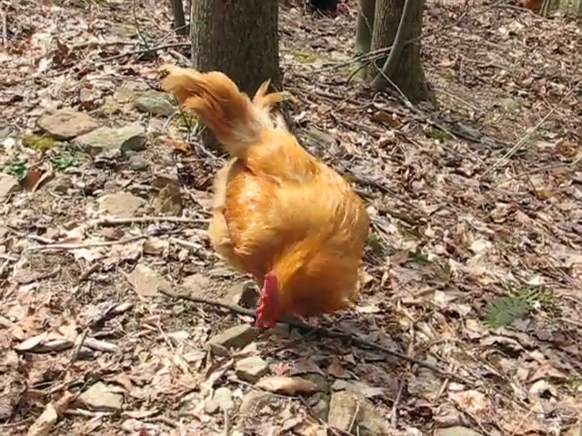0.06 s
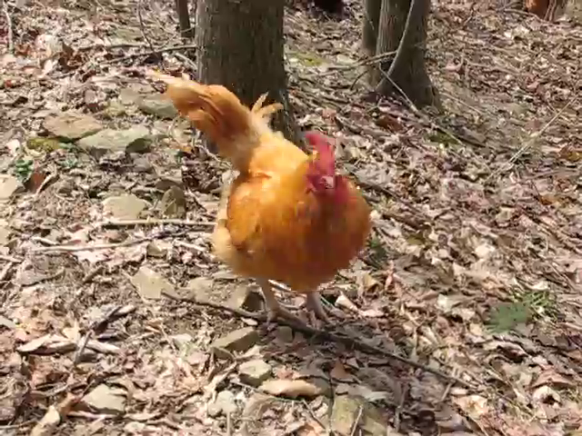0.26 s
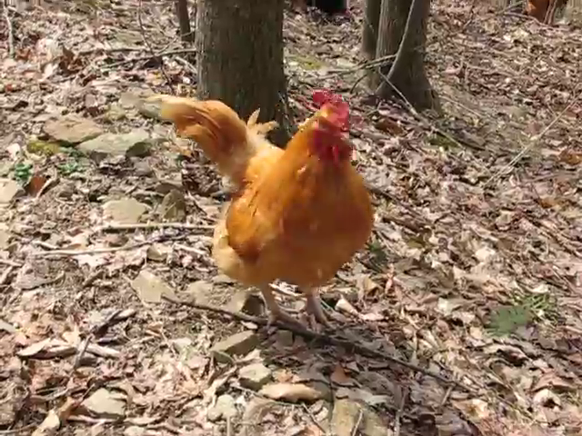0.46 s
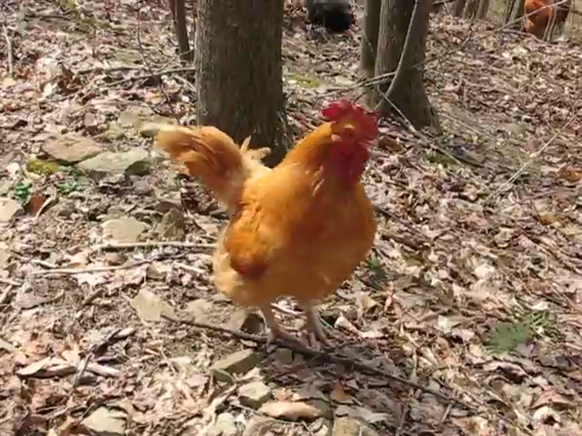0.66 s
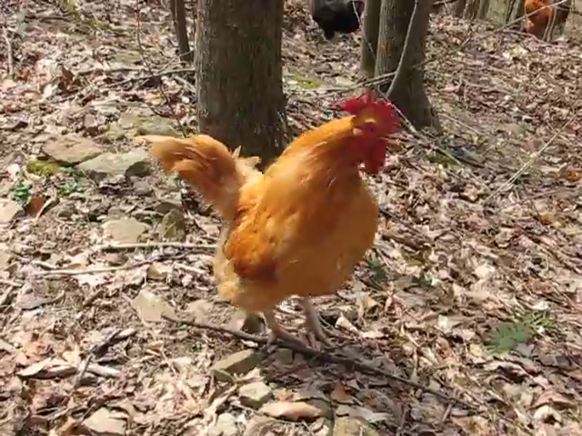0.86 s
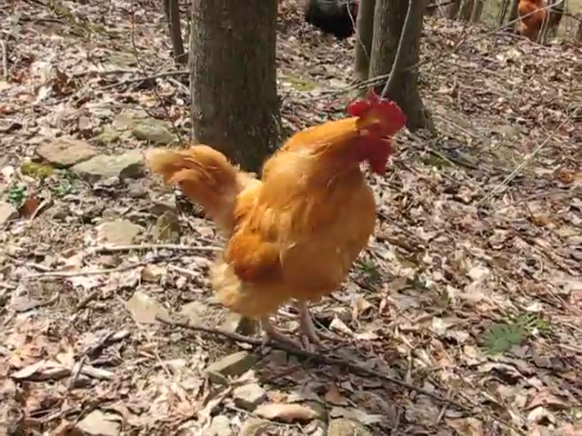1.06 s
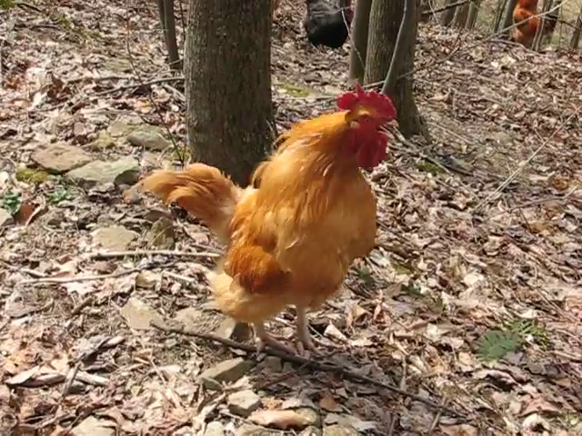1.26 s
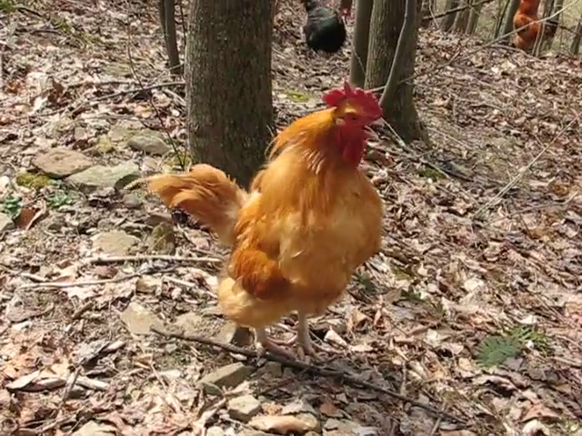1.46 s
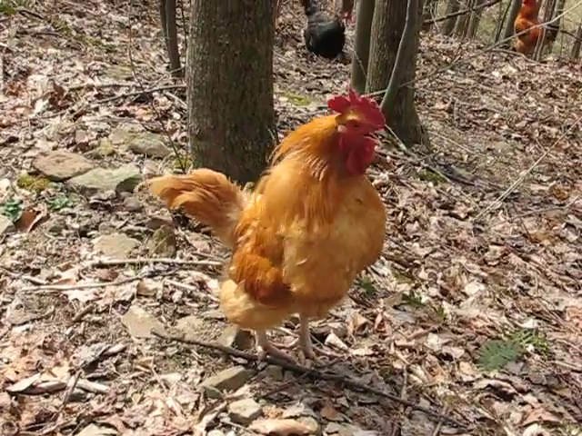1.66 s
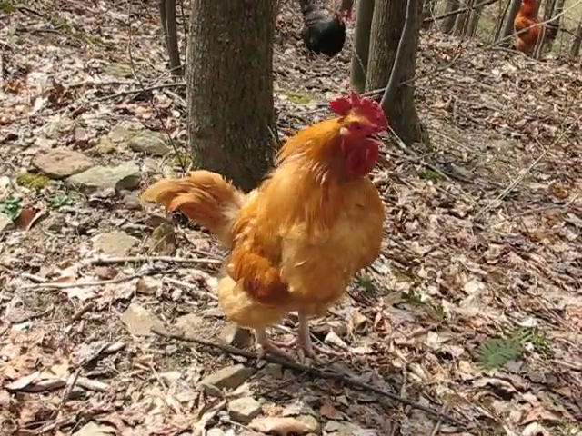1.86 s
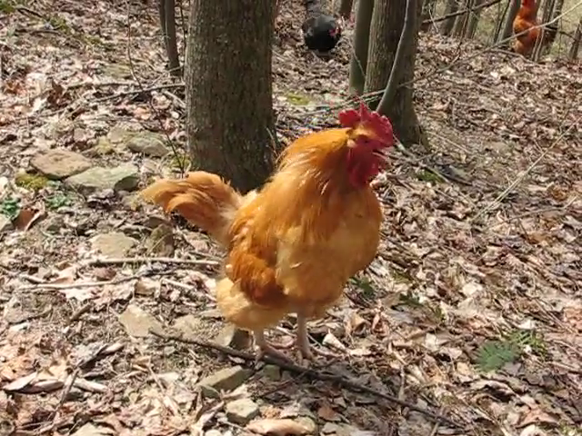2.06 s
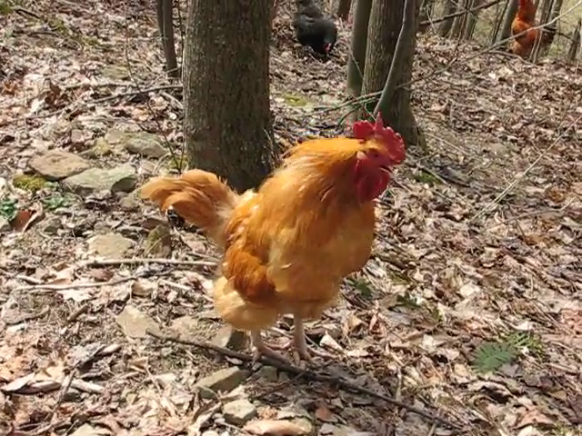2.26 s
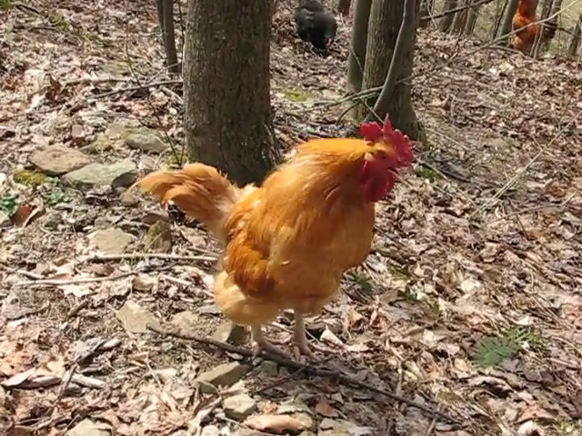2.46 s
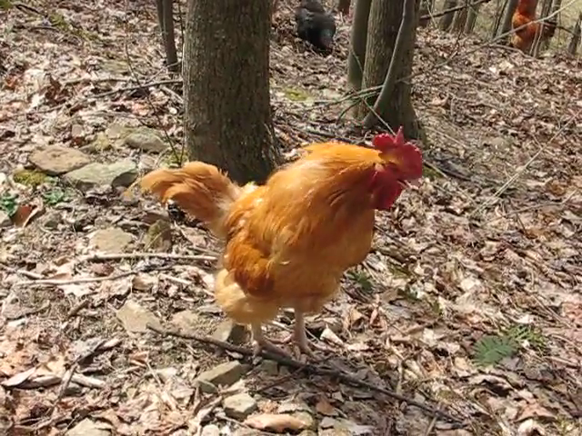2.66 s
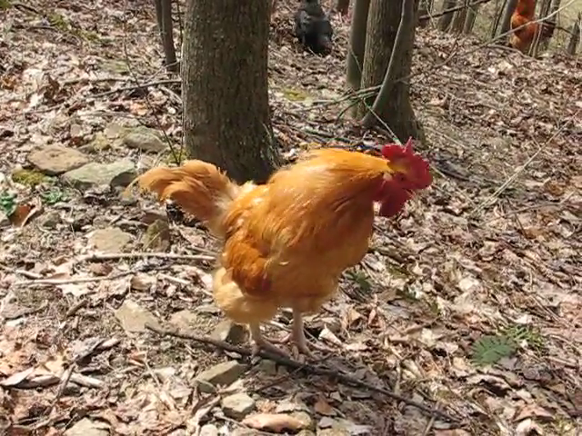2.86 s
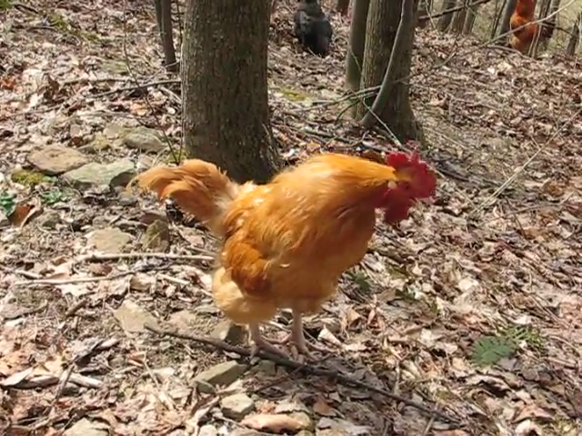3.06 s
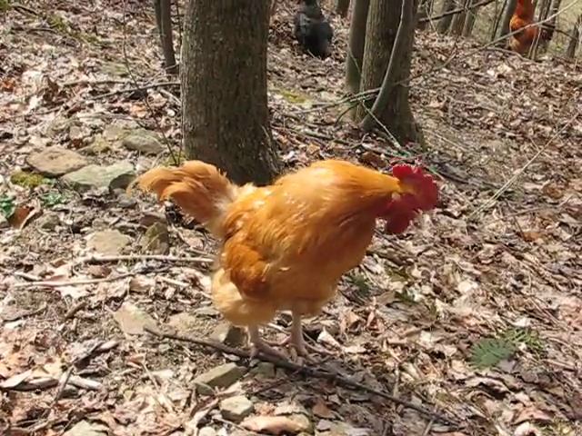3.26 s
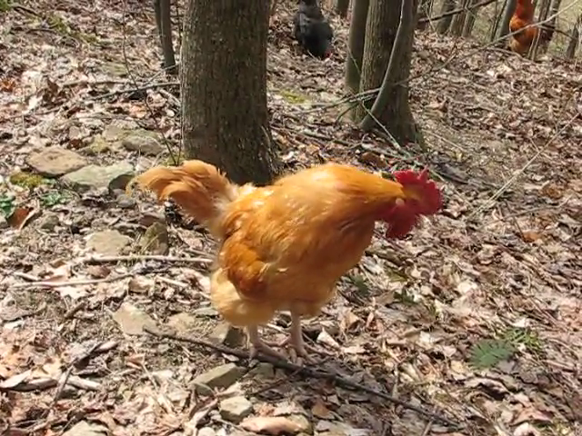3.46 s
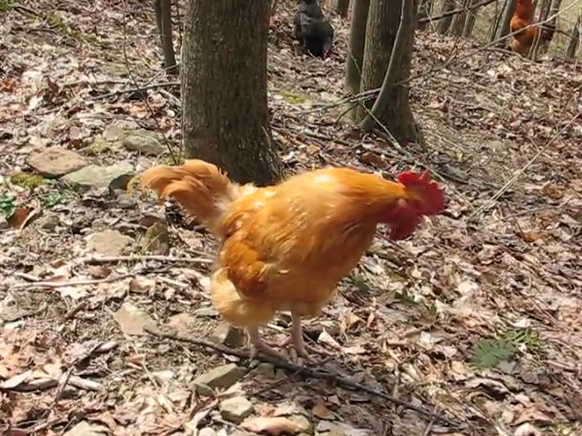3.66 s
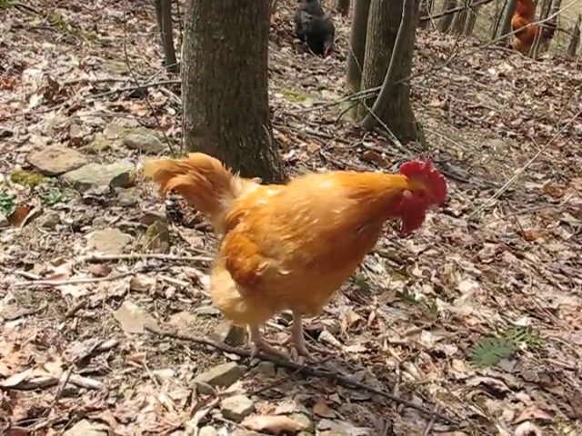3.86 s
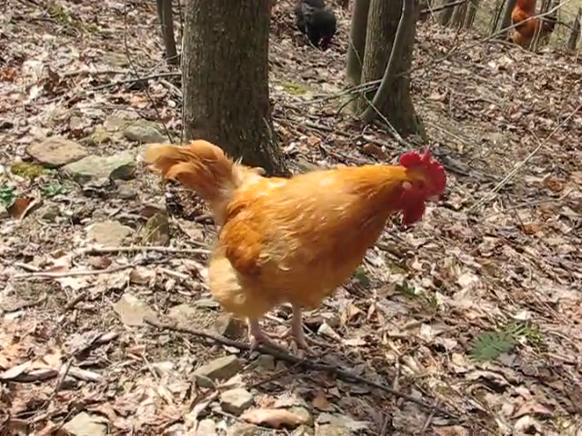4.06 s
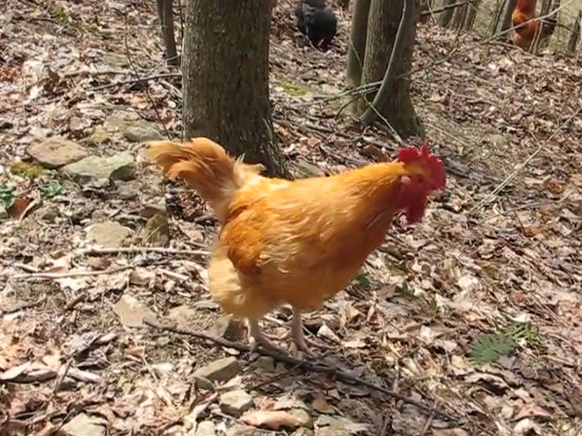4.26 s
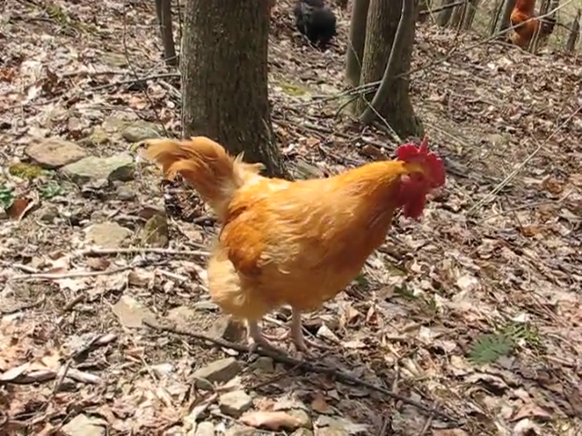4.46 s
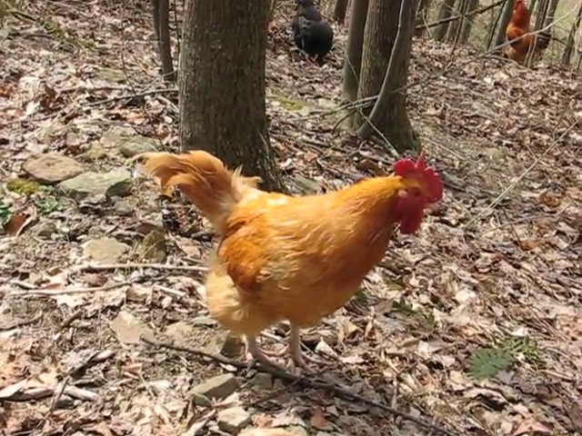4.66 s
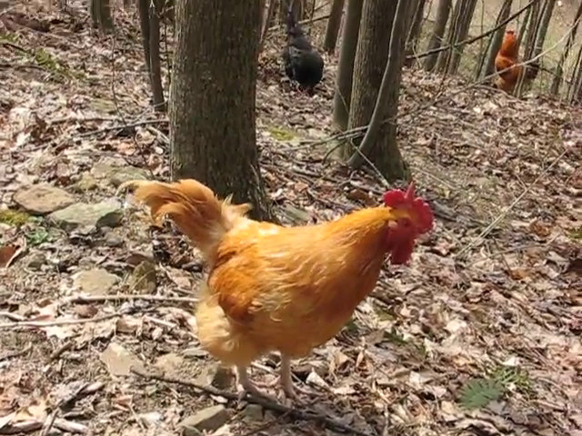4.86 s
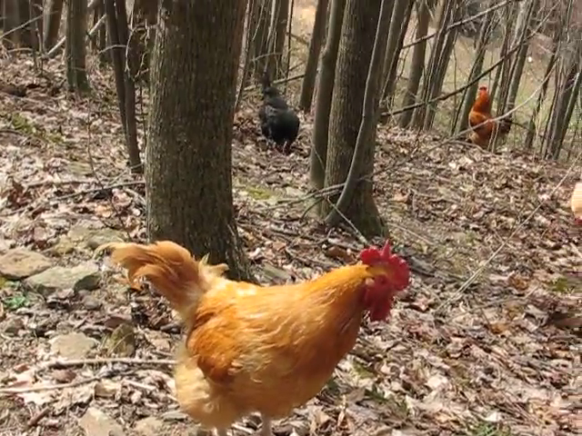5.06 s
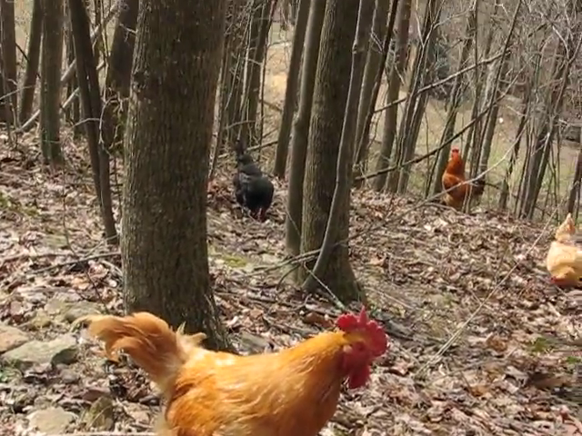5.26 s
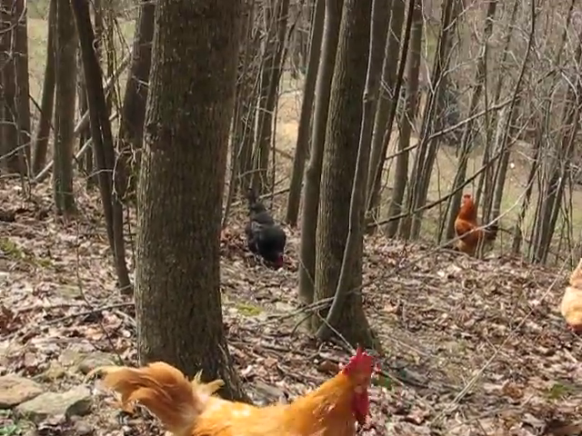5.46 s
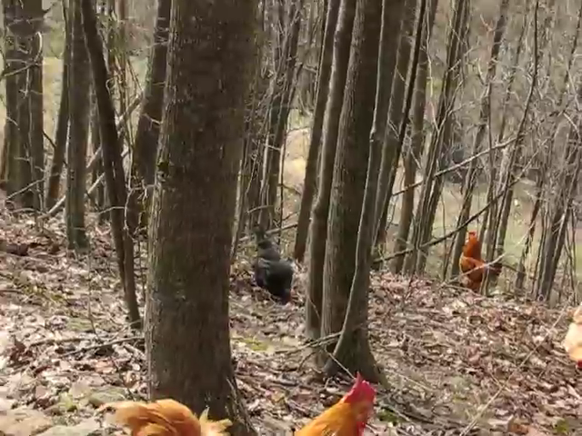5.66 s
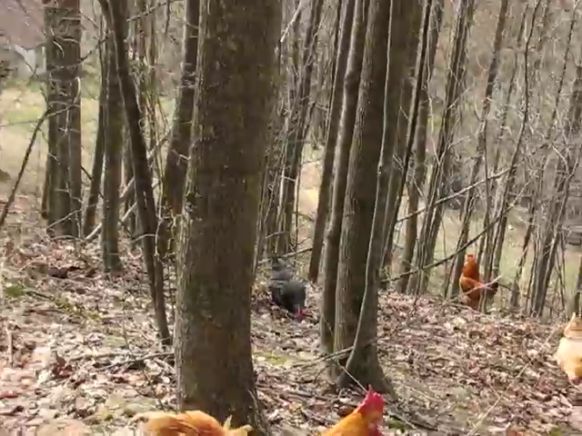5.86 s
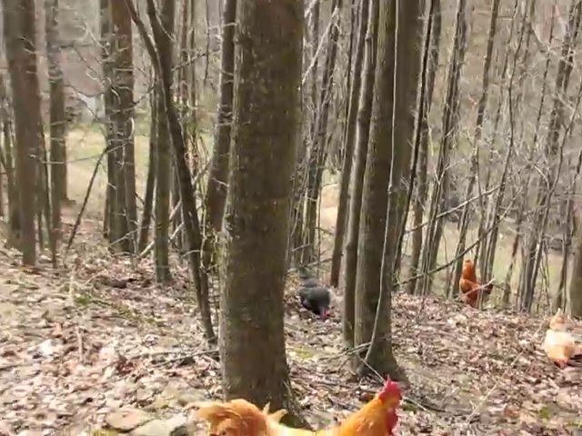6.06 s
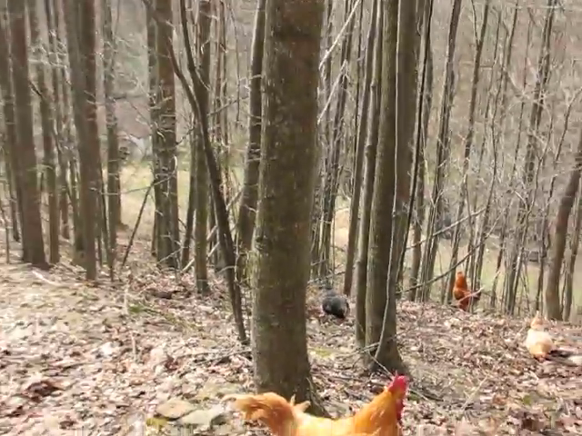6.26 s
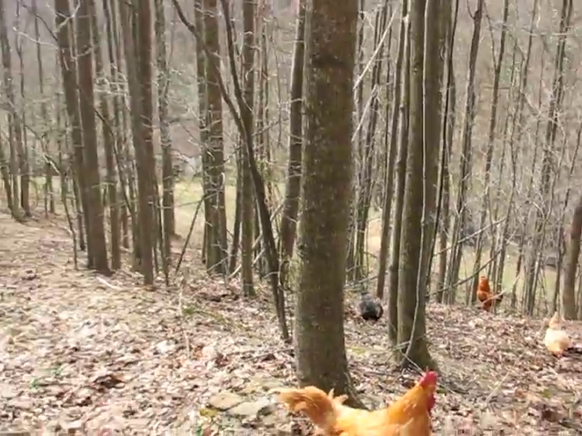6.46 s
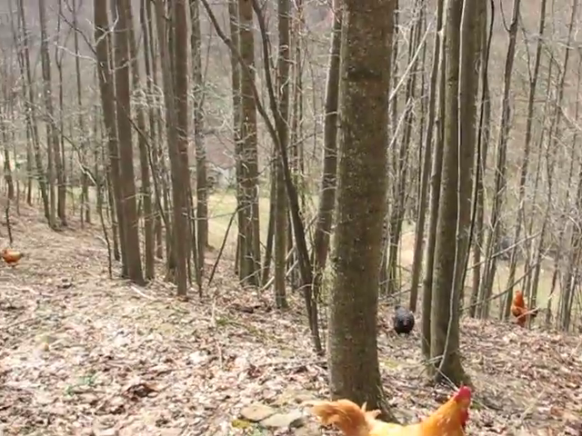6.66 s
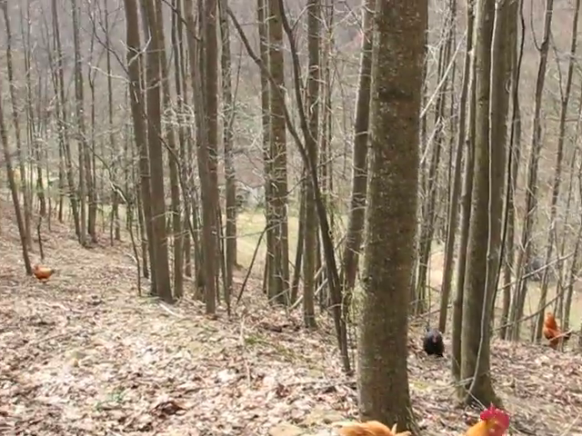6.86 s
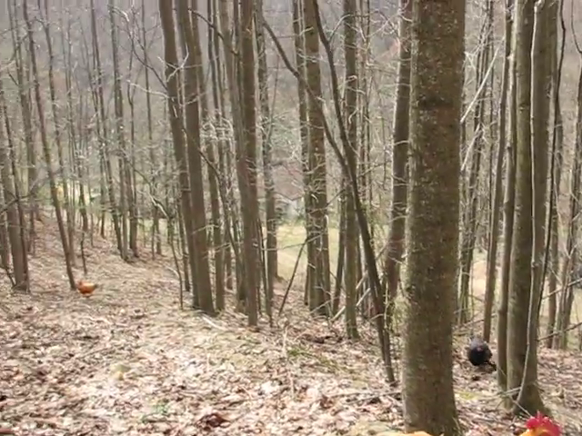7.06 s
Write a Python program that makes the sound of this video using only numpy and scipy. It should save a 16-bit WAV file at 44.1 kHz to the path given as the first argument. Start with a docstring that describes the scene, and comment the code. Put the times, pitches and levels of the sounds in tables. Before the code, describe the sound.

On a quiet wooded slope, a soft wash of air and low rumble lie under everything, with a very faint high electronic whistle. In the first half second, dry leaves snap and a hen peeps twice. From 0.5 to 1.4 s a thin, fluttering crow, probably a second bird, leads in, with louder leaf crackles around 0.9 to 1.05 s. The near rooster crows loudly from 1.1 s: a short arched note, another at 1.5, then a long brassy, rasping note from 1.6 to 3.6 that climbs, warbles, holds and sags. It drops quickly and fades into a soft purr by 4 s, with faint echoes from the trees. From 4 to 6 s come hoarse rasps, small peeps, murmuring hens, and sharp camera clicks with dull thuds. A zoom motor whirrs up, stopping near 6.6 s; leaves crackle again at 6.9.

```python
"""A rooster on a wooded hillside

A rooster crows once: two short arched notes, a long rasping one that warbles and sags, a closing fall and a purr.
Its voice is a row of uneven pulses ringing a throat and windpipe; a thinner crow leads in, probably a second bird.
Dry leaves crackle as bursts of tiny clicks, hens peep in gliding tones, and soft hoarse rasps mix voice and air.
A hand-held camera clicks and its zoom motor whirrs (filtered noise), over a soft wash of air and a low rumble."""
import sys
import numpy as np
from scipy import signal
from scipy.fft import rfft, irfft, next_fast_len
from scipy.io import wavfile
from scipy.ndimage import uniform_filter1d

SR = 44100
rng = np.random.default_rng(int(sys.argv[2]) if len(sys.argv) > 2 else 0)


def generate_wav(sig):
    """Save sig (samples, or channels by samples) to the path in sys.argv[1] as 16-bit PCM at SR."""
    pcm = np.round(np.clip(np.atleast_2d(sig).T, -1, 1) * 32767).astype(np.int16)
    wavfile.write(sys.argv[1], SR, pcm)


N = 313110
T = np.arange(N) / SR  # time of every sample in seconds


def amp(db):
    """Turns decibels into a gain."""
    return 10 ** (np.asarray(db) / 20)


def unit(x):
    """Scales a sound to rms 1."""
    return x / np.sqrt(np.mean(x ** 2) + 1e-20)


def curve(rows, axis=1, outside=None):
    """Reads one column of a time table at every sample."""
    rows = np.asarray(rows)
    return np.interp(T, rows[:, 0], rows[:, axis], outside, outside)


def read(points, hz):
    """Reads a spectrum table on a log-frequency axis."""
    table_hz, value = np.transpose(points)
    return np.interp(np.log(hz + 1), np.log(table_hz + 1), value)


def colour(x, points):
    """Filters a sound by a spectrum table of (hz, db), then scales it to rms 1."""
    size = next_fast_len(N, True)
    gain = amp(read(points, np.fft.rfftfreq(size, 1 / SR)))
    return unit(irfft(rfft(x, size) * gain, size)[..., :N])


def wander(hz, size=16384):
    """Random motion that is slow up to about the given rate; rms 1."""
    motion_hz = np.fft.rfftfreq(size, T[-1] / size)
    slow = irfft(rfft(rng.standard_normal(size)) / (1 + (motion_hz / hz) ** 4))
    return np.interp(T, np.linspace(0, T[-1], size), unit(slow))


def stereo_noise(same):
    """Two channels of noise; same is the share of power they have in common (0-1)."""
    same = np.clip(same, 0, 1)
    return np.sqrt(same) * rng.standard_normal(N) + np.sqrt(1 - same) * rng.standard_normal((2, N))


def ring(points, size=2048):
    """How a body with this spectrum table rings after one tap (minimum phase); peak 1."""
    log_gain = np.log(amp(read(points, abs(np.fft.fftfreq(size, 1 / SR)))))
    response = np.fft.ifft(np.exp(np.conj(signal.hilbert(log_gain)))).real[:size // 2]
    return response / abs(response).max()


def resonate(x, hz, width):
    """A steep resonance of gain 1 whose frequency may be a curve; both settings in Hz."""
    angle = (2 * np.pi * (np.cumsum(hz * np.ones(N)) / SR % 1)).astype(np.float32)
    turn = np.array([np.cos(angle), np.sin(angle)])
    r = np.exp(-np.pi * width / SR)
    # shift the resonance down to 0 Hz, smooth there, and shift it back
    smooth = signal.lfilter([(1 - r) ** 2], [1, -2 * r, r * r], x * turn)
    return 2 * (turn * smooth).sum(0)


def steady(x, size=900):
    """Evens out the level over some cycles."""
    power = abs(uniform_filter1d(uniform_filter1d(x * x, size), size))
    return x / np.sqrt(power + 1e-12)


def add(mix, s, sound, pan_db=0):
    """Places a sound in time and between left and right (left minus right in dB)."""
    sides = amp([[pan_db / 2], [-pan_db / 2]])
    part = mix[:, round(s * SR):][:, :len(sound)]
    part += sound[:part.shape[1]] * sides / sides.mean()


def pulses(turns, count):
    """Sums equal harmonics of a running phase in turns; count may follow a curve."""
    half = np.pi * ((turns + .5) % 1 - .5) + 1e-9
    return np.sin((2 * count + 1) * half) / (2 * np.sin(half)) - .5


def gate(start, length, rise, fade):
    """Level in dB: 0 while held; rise and fade are the seconds that 20 dB take."""
    before, after = (start - T) / rise, (T - start - length) / fade
    return -20 * np.minimum(np.maximum(np.maximum(before, after), 0), 10)


def voiced(start, end):
    """Attack and release of a note, as a level in dB."""
    attack_db_per_s, release_db_per_s = 998.5, 601.5
    return gate(start, end - start, 20 / attack_db_per_s, 20 / release_db_per_s)


def bump(middle, length):
    """A smooth hump of height 1."""
    return np.maximum(1 - (2 * (T - middle) / length) ** 2, 0) ** 2


def air():
    """A soft wash among the trees and a low rumble, whose deepest part buffets each port on its own."""
    # tone of the wash: hz, relative_db
    wash_colour = [(150, -50), (250, -8.5), (686, -1), (802, -3.5), (906, 1.5), (1260, -4), (3170, -9.5),
                   (3710, -9), (4050, -9), (5070, -13), (7980, -27), (12500, -26), (16000, -25)]
    # level of the rumble, which then wavers: time_s, level_db
    rumble_level = [(0, -50.5), (1.35, -54), (2.7, -67.5), (3.65, -62), (4.4, -56.5), (5.5, -57),
                    (7.1, -52)]
    # tone of the rumble: hz, relative_db
    rumble_colour = [(20, -20), (55, -2.5), (95, -8), (170, 3.5), (240, -4.5), (400, -8), (1000, -61)]
    wash = colour(stereo_noise(0.61), wash_colour) * amp(-49 + 0.35 * wander(3.8))
    buffet = colour(stereo_noise(0), [(20, -2.5), (55, -6), (130, -9), (400, -48)])
    rumble = colour(stereo_noise(1.0), rumble_colour) + amp(-13.5) * buffet
    return wash + rumble * amp(curve(rumble_level) + 2 * wander(6.4))


def leaves(per_s=1400, spread_db=5.5, bed=1.0, trim_db=-1, clump_db=2.0):
    """Tiny fractures of dry leaves ring over a soft swish, with a few louder snaps."""
    # tone of a cracking leaf: hz, relative_db
    leaf_colour = [(880, -19.5), (1500, -13.5), (2190, -14.5), (2740, -12.5), (3220, -7), (3770, -12),
                   (7460, 1.5), (9370, -7), (14900, -26.5), (16000, -69)]
    # feet stir the litter: start_s, length_s, rise_s (time for 20 dB), level_db (before the trim)
    stirs = [(0, 0.24, .1, -49), (0.893, .2, 0.57, -34), (4.57, 0.1, 0.27, -47), (5.0, 0.99, 0.07, -66),
             (6.898, 0.17, 0.014, -32)]
    # single leaves snapping: time_s, peak_db, left_minus_right_db
    snaps = [(0.301, -27, -2), (0.385, -21.5, -2), (0.5524, -18, 1.5), (0.9148, -14.5, 1.5),
             (0.9456, -16.5, 0.5), (1.0493, -12.5, 0.5), (1.362, -22.5, -1), (3.8814, -30.5, 14),
             (4.0647, -32, 5), (4.6975, -27, -15), (5.2057, -33, -12), (6.897, -21.5, -3)]
    litter_db, stir_fade_s = -53.5, 0.37  # level before the trim; fade time for 20 dB
    strength = amp(spread_db * np.minimum(rng.exponential(1, N), 4))
    grains = (rng.random(N) < per_s / SR) * rng.choice([-1, 1], N) * strength
    side = rng.uniform(0.017, 0.8, N)  # each fracture has its own place
    crack = ring(leaf_colour)
    litter = unit(signal.oaconvolve(grains * np.array([side, 1 - side]) + 0, crack[None])[:, :N]) \
        if bed == 0 else None
    if litter is None:
        dry_litter = unit(grains * np.array([side, 1 - side])) + bed * stereo_noise(0.077)
        litter = unit(signal.oaconvolve(dry_litter, crack[None])[:, :N])
    stirring = amp(litter_db)
    for s, length, rise, db in stirs:
        stirring = stirring + amp(db + gate(s, length, rise, stir_fade_s))
    out = litter * stirring * amp(trim_db + clump_db * wander(35))
    for s, db, pan_db in snaps:
        burst = rng.standard_normal(len(crack)) * np.exp(-T[:len(crack)] / 0.0032)
        tear = np.convolve(burst, crack)
        add(out, s, amp(db) * tear / abs(tear).max(), pan_db)
    return out


def camera(whistle_hz=8255, whistle_db=-56, gear_hz=795, gear_db=-9):
    """The zoom motor's whirr, coloured noise and a gear tone, swells and stops; electronics whistle faintly."""
    # tone of the motor: hz, relative_db
    motor_colour = [(120, -63), (200, -25), (373, -8), (482, -19), (509, -17.5), (590, -15), (791, -9),
                    (883, -9.5), (1270, -16), (1420, -15.5), (2170, -26), (2960, -21), (3430, -27),
                    (7970, -19), (16000, -52)]
    gear = None
    whirr = colour(stereo_noise(0.12), motor_colour)
    gear = unit(resonate(rng.standard_normal(N), gear_hz, 48))
    whirr = whirr + amp(gear_db) * gear
    whistle = unit(resonate(rng.standard_normal(N), whistle_hz, 91))
    running = gate(5.96, 0.606, rise=0.68, fade=0.015)
    return whirr * amp(-41.5 + running + 3.0 * wander(23.0)) + amp(whistle_db) * whistle


def hens(waver=0.026, trim_db=-2):
    """Short, slightly hoarse peeps: gliding tones whose pitch wavers."""
    # start_s, length_s, start_hz, end_hz, level_db (before the trim)
    peeps = [(0.236, 0.051, 1305, 1250, -46), (0.427, 0.056, 1280, 1530, -42.5),
             (4.185, 0.078, 1250, 1520, -43), (4.531, 0.066, 1450, 1490, -47),
             (4.985, 0.051, 1370, 1440, -43.5), (5.158, 0.04, 1270, 1500, -45.5),
             (5.82, 0.054, 1366, 1330, -47), (5.89, 0.058, 1220, 1186, -49),
             (5.969, 0.082, 1244, 1520, -43.5)]
    out, wobble = np.zeros((2, N)), 1 + waver * wander(250)
    for s, length, start_hz, end_hz, db in peeps:
        hz = np.linspace(start_hz, end_hz, int(length * SR))
        hz = hz * wobble[int(s * SR):][:len(hz)]
        tone = np.sin(2 * np.pi * np.cumsum(hz) / SR)
        add(out, s, amp(db + trim_db) * tone * 2 * np.hanning(len(hz)))
    return out


def whine(airy=0.62, waver=0.0087, flutter_db=1.3):
    """A thin, fluttering crow from further off: pulses and breath through one fixed tone colour."""
    # course of the crow: time_s, pitch_hz, level_db
    course = [(.5, 562, -36), (.55, 578.5, -28.5), (.7, 653, -31), (.712, 887, -27), (.78, 946, -21.5),
              (.88, 874.4, -26.5), (1.07, 893, -23.5), (1.33, 888, -34.5), (1.44, 846, -31)]
    # its tone: hz, relative_db
    whine_colour = [(550, -35), (900, -8), (1200, -10), (1500, -7.5), (1850, 5.5), (2300, -13.5),
                    (2750, -13.5), (3200, -43), (3600, -6), (4200, -30), (7000, -44), (10000, -60)]
    turns = np.cumsum(curve(course) * (1 + waver * wander(125))) / SR
    reed = unit(pulses(turns, count=12)) + airy * rng.standard_normal(N)
    level = curve(course, axis=2) + voiced(course[0][0], course[-1][0]) + flutter_db * wander(66)
    return steady(colour(reed, whine_colour)) * amp(level)


def phrase():
    """Pitch, roughness and the four register levels of the crow, note by note."""
    # two opening notes and the closing fall, each one arch of pitch: start_s, length_s, top_s (after the start),
    # start_hz, top_hz, end_hz, fundamental_db, throat_db, brassiness_db, sizzle_db
    notes = [(1.103, 0.19, 0.073, 489.7, 588.3, 550.5, -12, -19.5, -24.5, -28),
             (1.466, 0.12, 0.11, 526.3, 588.6, 518.9, -17.5, -19.5, -24, -34),
             (3.651, 0.1, .002, 476, 477, 308, -30, -25, -27, -33)]
    # the long note climbs, holds and sags: time_s, pitch_hz
    held_pitch = [(1.61, 533), (1.69, 550.5), (1.765, 601.4), (1.84, 586), (1.925, 604), (1.945, 645.4),
                  (2.06, 618.2), (2.52, 620.3), (2.9, 595.8), (3.1, 600.2), (3.26, 580.8), (3.32, 554.2),
                  (3.635, 513)]
    # and swells out of a gurgle: time_s, fundamental_db, throat_db, brassiness_db, sizzle_db
    held_level = [(1.63, -36.5, -26, -34.5, -46), (1.71, -32, -16, -21.5, -33.5),
                  (1.84, -22.5, -16.5, -26, -32), (2.01, -15, -16, -22.5, -26.5),
                  (2.13, -17, -17, -24, -23), (2.58, -22, -18, -27.5, -22.5),
                  (2.85, -17.5, -23.5, -26.5, -22.5), (3.07, -17.5, -21.5, -25.5, -21.5),
                  (3.2, -17, -20, -30, -25), (3.34, -15.5, -24.5, -27, -25.5), (3.4, -19, -24, -25, -23),
                  (3.52, -19.5, -23, -26.5, -22.5), (3.63, -19.5, -26, -22.5, -33.5)]
    # the voice breaks into a higher register: start_s, length_s, pitch_factor
    breaks = [(1.52, .055, 1.11), (1.771, .059, 1.275)]
    # hoarse patches: middle_s, length_s, added_roughness (0-1)
    hoarse = [(1.19, .16, .3), (1.635, .17, .52), (1.735, .09, .2), (2.33, .36, .23), (2.58, .48, .25),
              (3.0, .18, .16), (3.31, .15, .23)]
    clear_rough, edge_rough, edge_s, lead_in_s = .08, .28, .05, .014
    held_start, held_end = held_pitch[0][0], held_pitch[-1][0]
    # after the second break the pitch warbles, slowing and settling
    warble_s, warble_hz, slowing_s, warble_depth, warble_decay_s = 1.836, 28.27, 0.3706, 0.059, 0.23
    since = np.maximum(T - warble_s, 0)
    warble = np.sin(2 * np.pi * warble_hz * slowing_s * np.log1p(since / slowing_s))
    pitch = curve(held_pitch) * (1 - warble_depth * warble * np.exp(-since / warble_decay_s))
    loudest = voiced(held_start, held_end)
    levels = np.array([curve(held_level, axis=k + 1) for k in range(4)]) + loudest
    rough = clear_rough + sum(height * bump(s, length) for s, length, height in hoarse)
    for s, length, top_s, start_hz, top_hz, end_hz, low_db, throat_db, brass_db, sizzle_db in notes:
        # 0 at the top of the arch, 1 at its ends
        off = np.interp(T, [s, s + min(top_s, length), s + length], [1, 0, 1]) ** 1.7
        # just outside the note the pitch drops by a further share of the arch
        beyond = np.clip(np.maximum(s - T, T - s - length) / (2 * lead_in_s), 0, 1)
        arch_hz = top_hz - np.where(T < s + top_s, start_hz, end_hz)
        arch = top_hz - arch_hz * (off + .6 * beyond)
        envelope = voiced(s, s + length)
        pitch = np.where(envelope > loudest, arch, pitch)
        loudest = np.maximum(loudest, envelope)
        # away from the top the fundamental thins and the throat blares
        registers = [low_db - 7.5 * off, throat_db + 7 * off, brass_db, sizzle_db]
        levels = np.maximum(levels, [db + envelope for db in registers])
        # the voice is rough as it catches and, before the closing fall, as it lets go
        catch = bump(s - lead_in_s, edge_s)
        let_go = bump(s + length + lead_in_s, 2 * edge_s) * (s < held_end)
        rough = np.maximum(rough, clear_rough + edge_rough * (catch + let_go))
    for s, length, factor in breaks:
        pitch = pitch * np.where((T > s) & (T < s + length), factor, 1)
    # until the warble starts the pitch also trembles; a faint waver runs throughout
    pitch = pitch * (1 + .014 * (T < warble_s) * wander(36) + .0025 * wander(18))
    # the upper registers sway in strength
    levels[1:] += 1.2 * np.array([wander(25) for _ in range(3)])
    return uniform_filter1d(pitch, size=300), rough, levels


def crow(jitter_hz=350, jitter=.06, drift=0.011, shimmer=0.54, stumble=3.7, hiss=.22, rattle=1.3, beating_db=5.5,
         second_db=-6, growl_db=-10, leak_db=-22, half_db=-30, beak_width=400, hollow_width=750):
    """Uneven pulses of the syrinx (the bird's voice organ) ring the throat and the windpipe."""
    # strong and weak pulses alternate: time_s, depth (0-1)
    doubling_depth = [(1.3, 0.17), (2.14, .04), (2.23, 0.78), (2.85, .58), (3.3, 0.89), (3.52, 0.15),
                      (3.7, 0)]
    # neck and beak retune the voice: time_s, main_resonance_hz, windpipe_factor, hollow_hz
    beak_course = [(1.1, 1463, 0.99, 3470), (1.3, 1546, 0.99, 3870), (1.47, 1934, .99, 2576),
                   (1.92, 1920, 1.019, 2900), (2.0, 1750, 0.99, 2720), (2.2, 1674, 1.08, 2660),
                   (2.22, 1620, 1.023, 4270), (2.62, 1491, 0.99, 3395), (2.95, 1670, 1.011, 2890),
                   (3.25, 1680, 1.013, 2720), (3.45, 1500, 1.015, 2500), (3.64, 1588, .98, 2383),
                   (3.78, 1240, 0.99, 2393)]
    # windpipe resonances: hz (before the windpipe factor), width_hz, relative_db
    windpipe = [(2992, 270, 2), (4117, 174, 8), (5152, 265, 6), (6910, 1730, 4), (7645, 186, 9),
                (8990, 300, -1), (10110, 630, -8.5), (12560, 400, -19)]
    pitch, rough, levels = phrase()
    turns = np.cumsum(pitch * (1 + drift * rough * wander(200))) / SR + jitter * rough * wander(jitter_hz)
    # every other pulse is weaker and a little late; when rough, this alternation stumbles
    doubling = curve(doubling_depth) * np.cos(np.pi * turns + stumble * rough * wander(31.3))
    folds = pulses(turns + 0.049 * doubling, count=16000 / pitch) * (1 + doubling)  # harmonics up to 16 kHz
    puffs = unit((0.37 + np.exp(-(turns % 1) / 0.94)) * rng.standard_normal(N))  # breath in time with the pulses
    drive = unit(folds) * (1 + shimmer * rough * wander(130)) + hiss * rough * puffs
    fundamental = resonate(resonate(drive, pitch, 136), pitch, 550)
    fundamental += amp(half_db) * resonate(drive, pitch / 2, 60)  # the alternation sounds an octave below
    # a wide-open beak raises the main resonance and damps it
    beak = curve(beak_course)
    damped = np.clip((beak - 1700) / 350, 0, 1)
    throat = (1 - damped) * resonate(drive, beak, beak_width) + damped * resonate(drive, beak, 2130)
    throat += amp(second_db) * resonate(drive, 2 * pitch, 165)
    throat += amp(growl_db) * resonate(drive, 1.5 * pitch, 49)
    throat += amp(leak_db) * resonate(drive, 2270, 210)
    throat += rattle * rough * (1 - damped) * resonate(puffs, beak, 240)  # noisy puffs rattle the main resonance
    throat = colour(throat, [(300, -59), (550, 15.5), (800, 5.5), (2350, 6.5), (2700, 4), (5000, -4)])
    stretch = curve(beak_course, axis=2)
    pipe = sum(amp(db) * resonate(drive, hz * stretch, width) for hz, width, db in windpipe)
    # a moving hollow is cut out of the spectrum, twice over in the windpipe
    hollow = curve(beak_course, axis=3)
    for _ in range(2):
        pipe = pipe - resonate(pipe, hollow, hollow_width)
    throat = throat - resonate(throat, hollow, hollow_width)
    brass = colour(pipe, [(1000, -30), (2400, 2), (2850, 5.5), (5400, -0.5), (6200, -20.5)])
    sizzle = colour(pipe, [(5600, -27.5), (6300, 0.5), (16000, 5.0)])
    # in rough stretches each upper register beats on its own
    registers = [steady(fundamental)]
    for part in (throat, brass, sizzle):
        registers.append(steady(part * amp(beating_db * rough * wander(143))))
    return sum(part * amp(db) for part, db in zip(registers, levels))


def purr(octave_db=-8):
    """A soft falling tone with its octave as the throat relaxes at the end of the crow."""
    # time_s, pitch_hz (before a random waver), level_db
    course = [(3.8, 299, -64), (3.88, 287.3, -50), (3.98, 255, -51), (4.04, 243, -59)]
    phase = 2 * np.pi * np.cumsum(curve(course) * (1 + 0.01954 * wander(65.3))) / SR
    tone = unit(np.sin(phase) + amp(octave_db) * np.sin(2 * phase))
    return tone * amp(curve(course, axis=2, outside=-140))


def ports(x):
    """The two microphone ports hear the birds' crowing with different level and phase."""
    # hz, left_minus_right_db
    balance = [(60, -10), (110, -2), (200, 5), (380, -0.5), (700, 3), (1290, 0), (2380, -6.5), (4400, -2.5),
               (8120, 0.5), (15000, -2.5)]
    # hz, left_minus_right_radians
    lead = [(0, -0.12), (1290, -0.049), (1810, -0.77), (4050, 0.59), (5510, -0.58), (6290, 0.77),
            (6550, 0.76), (6890, 0.41), (8530, -1.06), (10700, -0.3), (10900, -1.04), (13800, 0.79),
            (15000, -0.2), (16000, 0.0)]
    hz = np.fft.rfftfreq(N, 1 / SR)
    half = amp(read(balance, hz) / 2) * np.exp(.5j * read(lead, hz))  # each port takes half the difference
    return irfft(rfft(x) * np.array([half, 1 / half]), N)


def woods(x):
    """Trunks scatter sparse echoes; above 1.5 kHz, the higher the pitch the sooner they die."""
    # hz, t60_s (time to fall by 60 dB)
    echo_time = [(200, 0.61), (1500, 1), (4000, 0.73), (10000, 0.029)]
    sparse = rng.standard_normal((2, SR)) * (rng.random((2, SR)) < 1500 / SR)
    taps = sparse * (T[:SR] > .012)
    hz, t, z = signal.stft(taps, SR, nperseg=256)
    fading = amp(-60 * t / read(echo_time, hz)[:, None])
    tail = signal.istft(z * fading, SR, nperseg=256)[1]
    return signal.fftconvolve(x[None], tail / np.linalg.norm(tail[0]), axes=1)[:, :N]


def rasps(rise_s=0.013, fade_s=0.14, pitch_hz=495):
    """Soft hoarse rasps, probably from the birds: air with an unsteady voice in it."""
    # start_s, length_s, level_db
    moments = [(4.028, 0.016, -37.5), (4.39, 0.068, -37.5), (4.779, 0.054, -38), (4.998, 0.013, -45.5)]
    # hz, relative_db
    rasp_colour = [(600, -15), (1100, -8), (1500, -0.5), (1950, -2), (2500, -1), (3300, -2.5), (4300, -7),
                   (6000, -12.5), (12000, -25)]
    unsteady_hz = pitch_hz * (1 + .015 * wander(120) + .025 * wander(25))
    voice = unit(pulses(np.cumsum(unsteady_hz) / SR, count=14))
    level = sum(amp(db + gate(s, length, rise_s, fade_s)) for s, length, db in moments)
    return colour(.5 * voice + stereo_noise(.2), rasp_colour) * level


def handling(click_trim_db=2, thud_trim_db=5, thud_decay=0.0068, chatter=0.15, chatter_decay=0.0019, size=4000):
    """Fingers click the camera's shell, which rings briefly over a dull thud; decays in seconds."""
    # clicks: time_s, peak_db (before the trim), left_minus_right_db, thud_db (before the trim)
    clicks = [(4.1293, -5, -18, -32.5), (4.391, -11.5, -17, -35), (4.5788, -5.5, 2.5, -69),
              (5.4354, -11.5, -19, -40.5), (5.5063, -24.5, -24, -78), (6.1388, -18, -10, -35),
              (6.23, -20.5, 11, -65), (6.6001, -29, -15, -33.5)]
    # dull knocks of the hand and the lens drive: time_s, level_db, decay_s
    knocks = [(4.382, -24.5, 0.004), (5.435, -26.5, 0.0024), (5.654, -33, 0.0042), (5.659, -25, 0.011)]
    # tone of the ringing shell: hz, relative_db
    shell_colour = [(60, -65), (300, -33), (1500, -9), (3500, -3), (5200, -6.5), (6500, 3), (7400, 8.5),
                    (8400, -4), (11000, -8.5), (16000, -11)]
    # tone of the thud: hz, relative_db
    thud_colour = [(40, -45), (150, -44), (300, 6.5), (850, 11), (1400, 4), (2600, -9), (5000, -54),
                   (12000, -55)]
    out, t, tick = np.zeros((2, N)), T[:size], ring(shell_colour)
    # one long dull noise is cut into pieces, one for each thud or knock
    dull = colour(rng.standard_normal(N), thud_colour)[:N // size * size].reshape(-1, size)
    for (s, db, pan_db, low_db), body in zip(clicks, dull):
        contact = (t == 0) + chatter * rng.standard_normal(size) * np.exp(-t / chatter_decay)
        click = np.convolve(contact, tick)
        add(out, s, amp(db + click_trim_db) * click / abs(click).max(), pan_db)
        add(out, s, amp(low_db + thud_trim_db) * body * np.exp(-t / thud_decay), pan_db / 2)
    for (s, db, decay), body in zip(knocks, dull[::-1]):
        add(out, s, amp(db) * body * np.exp(-t / decay), pan_db=-5.5)
    return out


def far_hens(murmur_hz=930, width=90, rise_s=0.059, fade_s=0.25):
    """Hens murmur far off: noise through one narrow resonance, blurred by slow fades."""
    # start_s, length_s, level_db
    calls = [(4.682, 0.039, -49), (4.824, 0.032, -53), (5.08, 0.094, -59), (5.292, 0.073, -58)]
    level = sum(amp(db + gate(s, length, rise_s, fade_s)) for s, length, db in calls)
    return unit(resonate(rng.standard_normal(N), murmur_hz, width)) * level


def scene(echo_db=-32):
    """The crowing and its echoes, the hens and leaves around it, the camera's own noises."""
    crowing = crow() + whine() + purr()
    birds = ports(crowing) + amp(echo_db) * woods(crowing) + hens() + far_hens() + rasps()
    return birds + leaves() + handling() + camera() + air()


def record(dry):
    """Clips at full scale, then removes everything above about 16 kHz."""
    lowpass = signal.firwin(301, 16000, window=("kaiser", 9), fs=SR)
    return signal.oaconvolve(np.clip(dry, -1, 1), lowpass[None], "same")


dry = scene()
out = record(dry)
generate_wav(out)
```